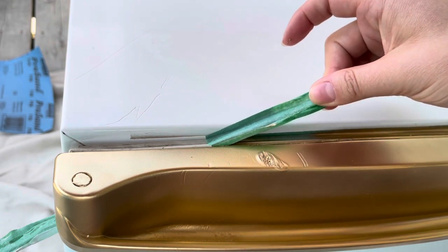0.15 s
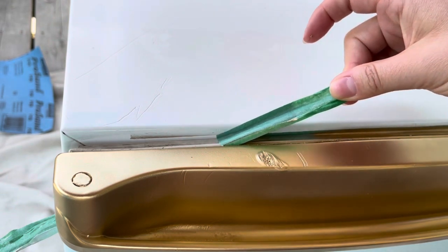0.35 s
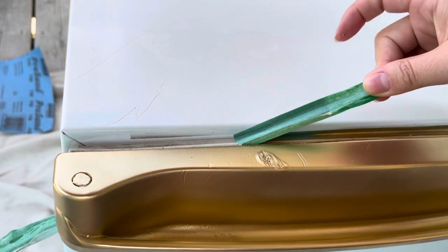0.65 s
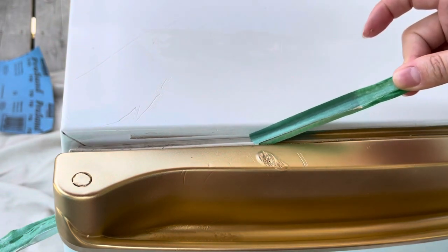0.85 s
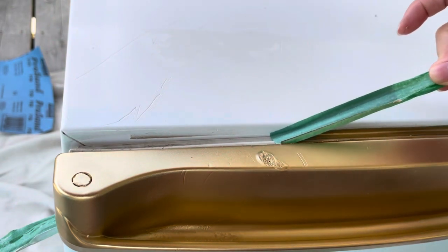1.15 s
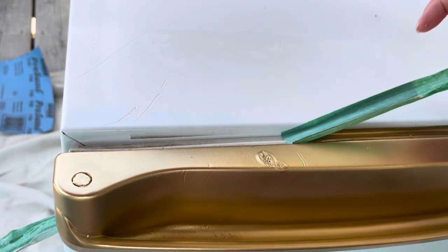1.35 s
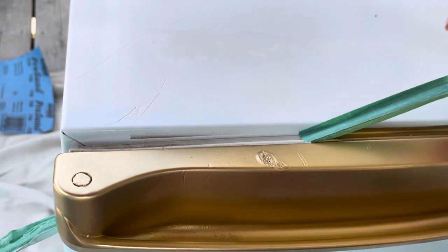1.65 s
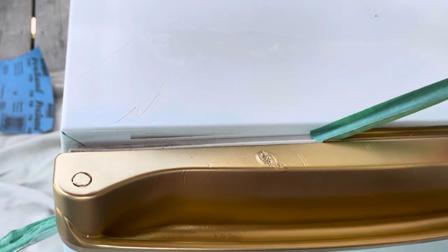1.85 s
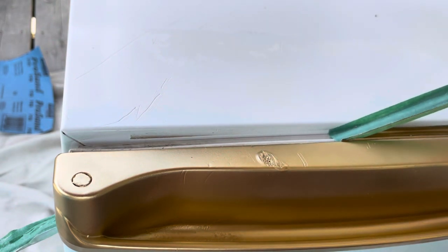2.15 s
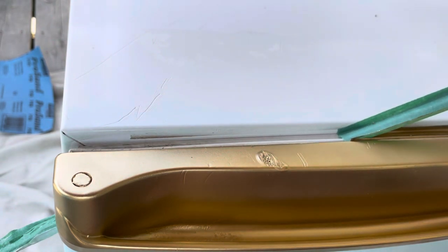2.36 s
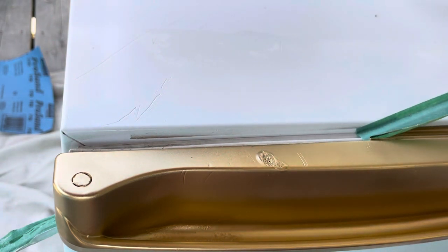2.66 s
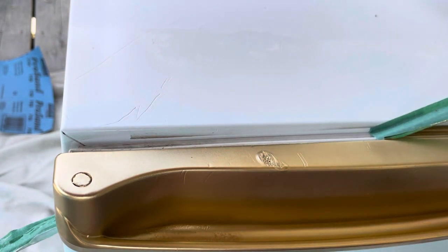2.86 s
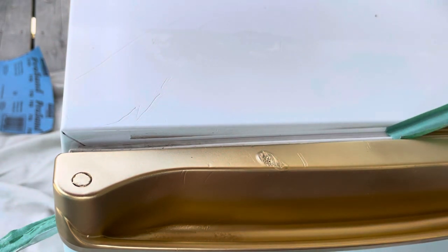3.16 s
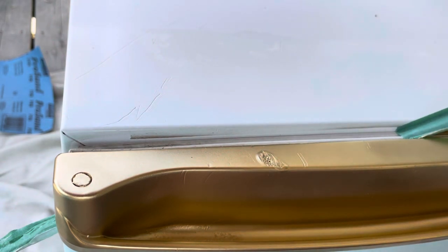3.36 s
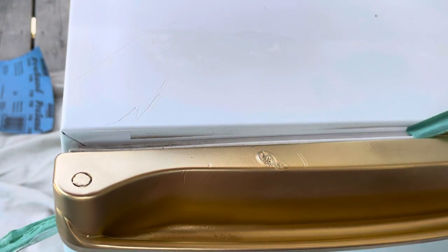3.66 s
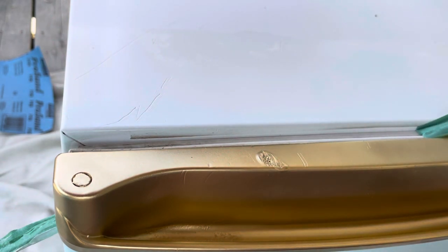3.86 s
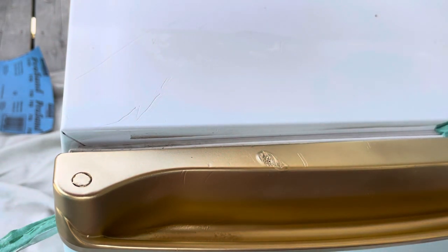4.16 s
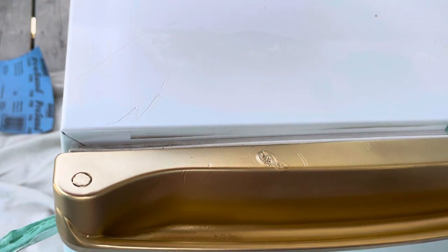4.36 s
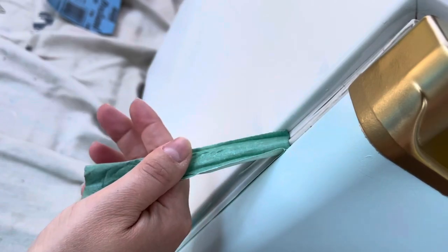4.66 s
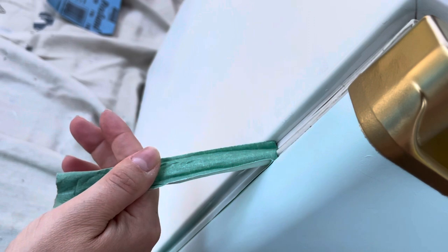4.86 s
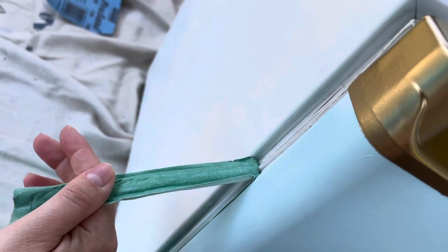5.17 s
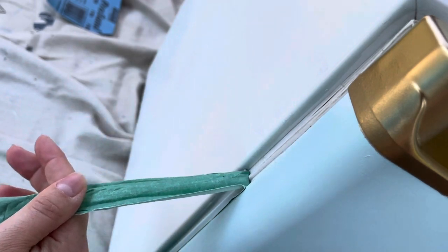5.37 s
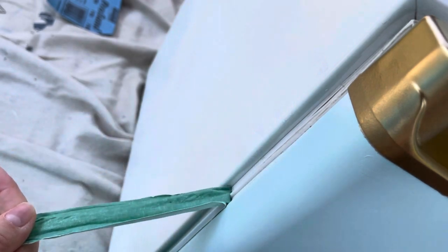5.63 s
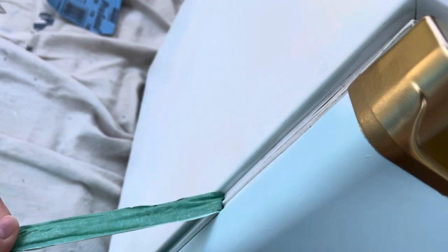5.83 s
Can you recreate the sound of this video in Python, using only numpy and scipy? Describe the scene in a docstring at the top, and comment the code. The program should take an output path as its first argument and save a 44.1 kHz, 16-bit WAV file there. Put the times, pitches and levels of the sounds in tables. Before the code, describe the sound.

From the start, masking tape peels slowly off a painted appliance door close to the microphone, a dense, fine crackle with a papery rasp that continues for all six seconds. Distant traffic rumbles softly underneath. The tape catches and lets go in light, dry ticks around 1.5 seconds and again between 2.2 and 2.8. From about 3.3 to 3.8 seconds a bird behind, slightly left, sings a quick phrase of falling notes, and the strip gives a crack at 3.5. Dull scrapes and sharper ticks follow around 3.9 to 4.2 seconds. At 4.5 the whole sound dips for an instant. The peeling then comes back a little stronger, with faint low handling knocks near 5 seconds and sharp snaps at about 4.9, 5.4 and 5.6, the one at 5.4 the loudest. The bird sings a second short phrase near 5.8 seconds, alongside a last tick.

```python
"""Masking tape is pulled slowly off a painted appliance door, close to the microphone.
Glue threads part in a dense fine crackle that shakes the paper strip; now and then the tape catches
and lets go with a sharp tick. The slack strip cracks and scrapes dully, among low handling knocks.
Behind it distant traffic rumbles and a bird sings two phrases of falling notes.
The overall level dips once, briefly."""
import sys
import numpy as np
from scipy import signal
from scipy.fft import rfft, irfft
from scipy.io import wavfile

SR = 44100
rng = np.random.default_rng(int(sys.argv[2]) if len(sys.argv) > 2 else 0)


def transcribe(signal):
    """Save signal, clipped to [-1, 1], as a 16-bit WAV file at the path in sys.argv[1]."""
    frames = np.atleast_2d(signal).T
    limited = np.clip(frames, -1, 1)
    pcm = np.round(limited * 32767).astype(np.int16)
    wavfile.write(sys.argv[1], SR, pcm)


N = 264600
TIME, BINS = np.arange(N) / SR, np.fft.rfftfreq(N, 1 / SR)


def gain_of(db):
    """Decibels to gain."""
    return 10 ** (np.asarray(db) / 20)


def unit_rms(x):
    """Scales to rms 1."""
    return x / np.sqrt(np.mean(x ** 2) + 1e-20)


def over_freq(points, hz=BINS):
    """Interpolates a table on a log frequency axis."""
    f, value = np.transpose(points)
    return np.interp(np.log(hz + 1), np.log(f + 1), value)


def over_time(rows):
    """Interpolates each column of a table, one value a sample."""
    t_s, *columns = np.transpose(rows)
    return [np.interp(TIME, t_s, column) for column in columns]


def add(mix, t_s, sound):
    """Mixes a sound in at t_s."""
    part = mix[round(t_s * SR):][:len(sound)]
    part += sound[:len(part)]


def swell(t_s, half_width_s):
    """Gaussian of height 1 around t_s."""
    return np.exp(-((TIME - t_s) / half_width_s) ** 2)


def wander(hz):
    """Smooth random curve of rms 1, up to the given rate."""
    return unit_rms(irfft(rfft(rng.standard_normal(N)) / (1 + (BINS / hz) ** 4), N))


def colour(x, spectrum, size=1024):
    """Causal filter of unit energy with the given spectrum."""
    log_gain = np.log(gain_of(over_freq(spectrum, abs(np.fft.fftfreq(size, 1 / SR)))))
    impulse = np.fft.ifft(np.exp(np.conj(signal.hilbert(log_gain)))).real[:size // 2]
    return signal.oaconvolve(x, impulse / np.linalg.norm(impulse))[:N]


def resonate(x, hz, width_hz):
    """Resonance that follows the curve hz, applied twice for steep sides."""
    carrier = np.exp(2j * np.pi * np.cumsum(hz) / SR)
    r = np.exp(-np.pi * width_hz / SR)
    return (carrier * signal.lfilter([(1 - r) ** 2], [1, -2 * r, r * r], x / carrier)).real


def echoes(x, t60_s, size=4096):
    """Decaying reflections, different on each side and shifting from moment to moment."""
    t = np.arange(2 * size) / SR
    hop = size // 2
    frames = np.lib.stride_tricks.sliding_window_view(np.pad(x, (hop, size)), size)[::hop]
    taps = rng.standard_normal((2, len(frames), len(t))) * gain_of(-60 * t / t60_s) * (t > .001)
    taps /= np.linalg.norm(taps, axis=2, keepdims=True)
    tails = signal.fftconvolve((frames * signal.windows.cosine(size))[None], taps, axes=2)
    out = np.zeros((2, N + 4 * size))
    for k in range(len(frames)):
        out[:, k * hop:][:, :tails.shape[2]] += tails[:, k]
    return out[:, hop:][:, :N]


# Left-right phase; the top treble sits in the centre: f/Hz, left lead/rad
STEREO_PHASE = [(300, 0), (2000, .6), (5200, .9), (5900, -1.5), (6900, -1.1), (7700, -2.8), (8300, -3.1),
                (9400, -3.2), (10200, -4.1), (11400, -4.9), (12900, -6.2), (14000, -6.28)]
# Colour of the diffuse stereo part; the top treble is the same on both sides: f/Hz, gain/dB
DIFFUSE_EQ = [(500, 9), (3000, -3), (4600, -5.5), (6200, 0), (7300, -3), (8300, -9.5), (9400, -13),
              (10200, -4.5), (12000, -0.5), (13500, -57)]
def near(x, wet_db, t60_s):
    """A close sound in stereo: a direct part out of step left to right, plus a short diffuse tail."""
    direct = rfft(x) * np.array([np.ones(len(BINS)), np.exp(-1j * over_freq(STEREO_PHASE))])
    diffuse = rfft(echoes(x, t60_s)) * gain_of(over_freq(DIFFUSE_EQ) + wet_db)
    return irfft(direct + diffuse, N)


def threads(per_s, spread_db):
    """Glue threads snap at random moments; most are tiny, a few large."""
    size = gain_of(spread_db * np.minimum(rng.exponential(1, N), 4))
    return size * rng.choice([-1, 1], N) * (rng.random(N) < per_s / SR)


# Course of the pull: t/s, fizz level/dB, rasp level/dB
PULL_LEVELS = [(0, -51.5, -54), (.25, -44.5, -52), (.95, -45.5, -48.5), (1.35, -46.5, -50),
               (2.25, -47, -49.5), (2.95, -46, -47), (3.55, -48, -50), (4.0, -46.5, -51.5), (4.3, -49, -52),
               (4.85, -41.5, -49.5), (5.0, -43, -49.5), (5.17, -47, -57.5), (5.48, -38.5, -49),
               (5.72, -45, -52.5), (6, -45, -49.5)]
# Tape briefly gives way faster: t/s, half width/s, extra fizz/dB, extra rasp/dB
PULL_SURGES = [(1.02, .025, 2.5, 0), (1.47, 0.039, 0, 2.5), (1.69, .025, 3.5, 0.5), (2.41, 0.055, 2, 5.2),
               (2.69, 0.055, 3, 5.2), (3.23, 0.021, 3, 2.5), (3.70, 0.027, 5.5, 0), (4.02, 0.067, 3, 2.5),
               (4.16, .025, 8, 3.5), (4.45, 0.041, 6, 5.5), (4.68, 0.066, 0.5, 1), (4.943, 0.022, 9.5, 2),
               (5.385, 0.011, 4, -12), (5.553, 0.023, 5.5, -9)]
# Spectra of glue fizz and paper rasp: f/Hz, relative density/dB
FIZZ_SPECTRUM = [(2000, -20.5), (5500, -13.5), (7500, -2), (8800, -12), (10000, 0.5), (11200, -5.5),
                 (13800, -0.5), (15500, -7), (17000, -9.5)]
RASP_SPECTRUM = [(300, -6), (900, -5.5), (1800, -8), (2800, -7.5), (3800, -3), (4600, 1), (5200, 3),
                 (5650, -2), (6800, 1.5), (8000, -1), (11000, -20.5)]
# Taut strip resonances, sinking as it lengthens:
# f at peak/Hz, sink/(Hz/s), peak t/s, half width/s, bandwidth/Hz, level/dB
STRIP_MODES = [(7950, 1300, 0.67, .17, 340, -52), (4740, 500, 1.05, 0.092, 410, -52),
               (3750, 200, 1.08, .2, 450, -58.5), (4730, 2500, 1.175, .022, 200, -47.5),
               (4470, 600, 1.45, .2, 800, -59), (14000, 300, 1.03, .45, 1400, -49.5),
               (13700, 900, 1.8, 0.35, 1300, -48), (14100, 500, 2.53, .35, 2000, -51.5),
               (3900, 300, 2.06, 0.38, 640, -56.5), (6790, 1100, 2.16, 0.35, 520, -54.5),
               (4600, 200, 2.52, 0.4, 650, -55), (6900, 500, 2.7, 0.17, 600, -55.5),
               (3990, 250, 3.1, 0.18, 400, -55.5)]
def peel():
    """Threads part in tiny avalanches along the peel line; they fizz and shake the paper strip."""
    fizz_db, rasp_db = over_time(PULL_LEVELS)
    fizz_surge_db = sum(db * swell(t_s, half_s) for t_s, half_s, db, _ in PULL_SURGES)
    rasp_surge_db = sum(db * swell(t_s, half_s) for t_s, half_s, _, db in PULL_SURGES)
    avalanche_db = 2 * wander(hz=453) + .81 * wander(hz=40.2) + .5 * wander(hz=21)
    fine = threads(per_s=9000, spread_db=3)
    thick = gain_of(10) * threads(per_s=35, spread_db=1.5)
    snaps = fine + thick
    fizz = unit_rms(colour(snaps * gain_of(avalanche_db), FIZZ_SPECTRUM))
    fizz *= gain_of(fizz_db + fizz_surge_db)
    rasp = unit_rms(colour(snaps * gain_of(.64 * avalanche_db), RASP_SPECTRUM)) * gain_of(rasp_db)
    for centre_hz, sink_hz_per_s, t_s, half_s, width_hz, db in STRIP_MODES:
        hz = centre_hz - sink_hz_per_s * np.clip(TIME - t_s, -2 * half_s, 2 * half_s)
        plucks = threads(per_s=6000, spread_db=4) * gain_of(avalanche_db)
        rasp += unit_rms(resonate(plucks, hz, width_hz)) * gain_of(db) * swell(t_s, half_s)
    return near(fizz + rasp * gain_of(rasp_surge_db), wet_db=-.26, t60_s=.035)


# Outdoor sound field: f/Hz, left-right coherence
COHERENCE = [(30, 1), (130, 0.82), (260, 0.85), (450, 0.12), (800, 0), (2000, 0.19), (12000, 0)]
def outdoor_noise(spectrum):
    """Diffuse noise: alike on both sides in the bass, unrelated higher up."""
    left, unrelated = rfft(rng.standard_normal((2, N)))
    coherence = np.clip(over_freq(COHERENCE), -1, 1)
    right = coherence * left + np.sqrt(1 - coherence ** 2) * unrelated
    return unit_rms(irfft(np.array([left, right]) * gain_of(over_freq(spectrum)), N))


# Spectra of traffic rumble and tyre roar: f/Hz, relative density/dB
RUMBLE_SPECTRUM = [(13, -9.5), (22, -61), (45, -2), (70, 2), (173, -5.5), (244, -6.5), (332, -16),
                   (395, -14.5), (420, -25.5), (550, -42), (920, -120)]
TYRE_SPECTRUM = [(150, -9), (350, 1.5), (500, 1), (750, -2.5), (1200, -6), (2000, -9), (4000, -12),
                 (8000, -46), (16000, -103)]
# Course of the rumble: t/s, level/dB
RUMBLE_LEVELS = [(0, -39.5), (3, -39), (4.4, -37), (4.7, -39.5), (5.3, -40), (5.55, -36.5), (6, -36.5)]
# Distant engines: start/s, end/s, ease-off/s, top f/Hz, share of pitch lost/(1/s), level/dB
ENGINES = [(.6, 2.7, 2.2, 130, .02, -43.5), (2.22, 4.1, 2.85, 179, .16, -42),
           (2.85, 4.4, 2.8, 88, .16, -44.5), (3.0, 3.8, 3.2, 412, .15, -48),
           (.8, 1.6, 1.15, 405, .15, -51.5)]
def traffic(fade_s=.24):
    """Wavering rumble, a swell of tyre roar, and engine notes that sink as they ease off."""
    rumble = outdoor_noise(RUMBLE_SPECTRUM) * gain_of(over_time(RUMBLE_LEVELS)[0] + .5 * wander(hz=4.7))
    tyres = outdoor_noise(TYRE_SPECTRUM)
    tyres *= gain_of(-50 + 1.6 * swell(t_s=3.67, half_width_s=1.15) + .56 * wander(hz=2.9))
    sway = 1 + .0065 * wander(hz=14.4)
    flutter_db = 1.7 * wander(hz=10.4)
    engines = np.zeros(N)
    for start_s, end_s, ease_s, top_hz, sag_per_s, db in ENGINES:
        hz = top_hz * (1 - sag_per_s * np.maximum(TIME - ease_s, 0)) * sway
        fade = np.clip(np.minimum(TIME - start_s, end_s - TIME) / fade_s, 0, 1)
        engines += fade * gain_of(db + flutter_db) * np.sin(2 * np.pi * np.cumsum(hz) / SR)
    return rumble + tyres + engines


def burst(rise_s, size=4096):
    """A short, nearly white burst that swells and stops quickly."""
    u = np.arange(size) / (rise_s * SR)
    spectrum = rfft(u ** 2 * np.exp(1 - u ** 2) * rng.choice([-1, 1], size))
    whitened = spectrum / (unit_rms(abs(spectrum)) + .05) ** .75
    return irfft(whitened, size) * (u < 5)


def flurry(crack, peak_s=.0083, share_db=-5.5, limit_db=-33):
    """After each catch the tape runs ahead for a moment, parting many more threads."""
    u = np.arange(SR // 4) / (peak_s * SR)
    run = u * np.exp(-u)
    spurt = np.sqrt(abs(signal.oaconvolve(crack ** 2, run / run.sum())[:N])) * gain_of(share_db)
    limit = gain_of(limit_db)  # the most the hand allows
    envelope = limit * np.tanh(spurt / limit)
    return colour(envelope * unit_rms(threads(per_s=3500, spread_db=3)), FIZZ_SPECTRUM)


# Spectrum of a tick: f/Hz, relative density/dB
TICK_SPECTRUM = [(200, -26), (900, -19), (2200, -16), (3700, -13), (5500, -9), (7200, -3.5), (8800, -1.5),
                 (10500, -0.5), (12700, 2), (15200, -1.5), (17000, -5)]
# Tape lets go: t/s, level/dB, rise/s, strip ring f/Hz, ring gain/dB
RELEASES = [(1.4266, -24.5, .00018, 4500, -5), (1.4634, -23.5, .0003, 4500, -3),
            (1.4866, -24, .00018, 4500, -3), (1.681, -27, .0002, 4500, -3),
            (2.2255, -27.5, .0003, 4800, 11), (2.614, -28, .00025, 6800, 10),
            (2.6758, -25.5, .0003, 5000, 9), (2.7022, -24.5, .0003, 6000, 10),
            (2.801, -25, .00025, 4500, 3), (3.2096, -28.5, .0002, 4500, 3), (3.447, -30, .0005, 7000, 4),
            (3.816, -29, .0002, 4500, -3), (3.8699, -20, .00028, 4000, 10),
            (4.1504, -12.5, .00035, 3500, -5), (4.8596, -20.5, .0003, 4500, -2),
            (4.869, -24, .0002, 4500, -3), (4.921, -12, .0006, 3800, 6), (4.9254, -13.5, .00045, 4200, 1),
            (5.3113, -24, .001, 6500, 6), (5.4281, -5.8, .00055, 6500, 4), (5.6085, -13, .00036, 5500, 5),
            (5.6096, -14, .0004, 5000, 6), (5.6112, -14.5, .0005, 5200, 6), (5.6128, -22, .0014, 4500, 9),
            (5.648, -30, .0008, 6500, 2), (5.923, -13.5, .00022, 14500, 3), (5.9313, -21, .0008, 7000, 5),
            (5.938, -20, .0008, 14500, 5)]
def ticks(faint_per_s=11, faint_rise_s=.00014, faint_ring_hz=4700, spray_db=-10):
    """Many threads go at once in a dry tick that rings the taut strip and sprays each side separately."""
    faint_times_s = TIME[(rng.random(N) < faint_per_s / SR) & (TIME > faint_rise_s)]
    faint = [(t_s, rng.normal(-33, 1.5), faint_rise_s, faint_ring_hz, -1) for t_s in faint_times_s]
    snaps, ring, spray = np.zeros(N), np.zeros(N), np.zeros((2, N))
    for t_s, db, rise_s, ring_hz, ring_db in list(RELEASES) + faint:
        start_s = t_s - rise_s
        snap = gain_of(db) * burst(rise_s)
        add(snaps, start_s, snap)
        add(ring, start_s, gain_of(ring_db) * resonate(snap, np.full(len(snap), ring_hz), width_hz=1900))
        for side in spray:
            add(side, start_s, gain_of(db + spray_db) * burst(rise_s))
    crack = colour(snaps, TICK_SPECTRUM)
    spray = np.array([colour(side, TICK_SPECTRUM) for side in spray])
    return near(crack + ring + flurry(crack), wet_db=-11, t60_s=.045) + spray


# Bird notes: t/s, length/s, first f/Hz, last f/Hz, fall exponent (1 = straight), level/dB
BIRD_NOTES = [(3.308, .04, 4330, 4080, 1.3, -45), (3.336, 0.022, 4150, 3850, 1.13, -36),
              (3.31, .042, 3150, 2750, 2.1, -46), (3.43, .066, 5100, 3400, 1.7, -37),
              (3.488, .022, 3600, 3200, 1.1, -39), (3.556, .042, 4900, 2800, 1.4, -41),
              (3.645, .05, 4680, 2690, 1.9, -37), (3.755, 0.048, 4620, 3000, 3.3, -44.5),
              (5.758, 0.058, 4130, 3420, 1.87, -42.5), (5.768, 0.041, 2900, 2410, 1.2, -46.5),
              (5.893, 0.074, 5120, 3400, 2.4, -35), (5.952, 0.029, 3650, 3150, 1.1, -39)]
def bird(hoarse_pitch=.055, hoarse_db=4, wall_delay_s=.015):
    """Whistles that swell, fall ever faster and grow hoarse, with echoes from the walls around."""
    song, wall = np.zeros(N), np.zeros(N)
    hoarseness = np.array([wander(hz=700), wander(hz=220)])
    for t_s, length_s, first_hz, last_hz, exponent, db in BIRD_NOTES:
        u = np.linspace(0, 1, int(length_s * SR))
        wobble, tremor = u * np.roll(hoarseness, -round(t_s * SR), axis=1)[:, :len(u)]
        hz = (first_hz + (last_hz - first_hz) * u ** exponent) * (1 + hoarse_pitch * wobble)
        envelope = gain_of(db + hoarse_db * tremor) * abs(np.sin(np.pi * u)) ** 1.1
        note = envelope * np.sin(2 * np.pi * np.cumsum(hz) / SR)
        add(song, t_s, note)
        add(wall, t_s + wall_delay_s, note)
    direct = song * gain_of([[-1.5], [-5]])  # left of centre
    return direct + gain_of(-11.5) * wall + gain_of(-5) * echoes(song, t60_s=.25)


# Dull strip cracks and scrapes, low handling knocks: t/s, level/dB, rise/s, low f/Hz, high f/Hz
CRACKS_AND_KNOCKS = [(3.4822, -14.5, .0007, 3200, 9400), (3.965, -26, 0.00043, 1800, 5500),
                     (4.043, -33, 0.014, 1300, 5000), (4.1974, -19, 0.00025, 890, 4200),
                     (4.882, -23, 0.00027, 2500, 12000), (4.885, -32, 0.003, 300, 1200),
                     (4.935, -38, .03, 400, 1200), (5.087, -36.5, 0.0016, 450, 1100),
                     (5.471, -33, .028, 1900, 6600)]
def cracks_and_knocks():
    """Dull cracks and scrapes of the strip, and low handling knocks; each a burst in its own band."""
    out = np.zeros(N)
    for t_s, db, rise_s, low_hz, high_hz in CRACKS_AND_KNOCKS:
        band = signal.butter(2, [low_hz, high_hz], "bandpass", fs=SR, output="sos")
        hit = signal.sosfilt(band, burst(rise_s))
        add(out, t_s - rise_s, gain_of(db) * hit / abs(hit).max())
    return near(out, wet_db=-1.5, t60_s=.12)


def scene():
    """Tape in front, bird and street behind."""
    return peel() + cracks_and_knocks() + ticks() + bird() + traffic()


# Microphone imbalance: f/Hz, left over right/dB
MIC_BALANCE = [(40, -2), (70, 2.5), (250, -0.5), (1000, 1.7), (2300, 1), (4500, 2.5), (8000, -0.6)]
def record(dry, dip_s=4.531, dip_db=-27.5, fall_s=.0047, recover_s=.034, cutoff_hz=16050):
    """Slightly unequal microphones, a brief dip in level, then a low-pass."""
    tilted = irfft(rfft(dry) * gain_of(np.outer([.5, -.5], over_freq(MIC_BALANCE))), N)
    fall = np.clip(1 + (TIME - dip_s) / fall_s, 0, 1)
    dip = fall * np.exp(-np.maximum(TIME - dip_s, 0) / recover_s)
    lowpass = signal.firwin(401, cutoff_hz, window=("kaiser", 9), fs=SR)
    return signal.oaconvolve(tilted * gain_of(dip_db * dip), lowpass[None], "same")


dry = scene()
out = record(dry)
transcribe(out)
```